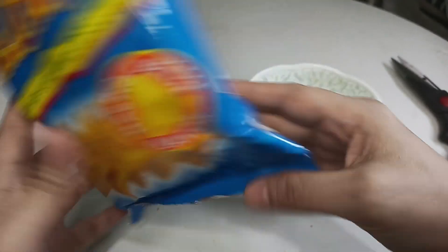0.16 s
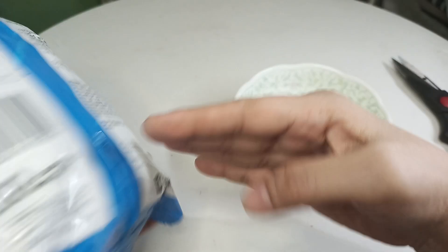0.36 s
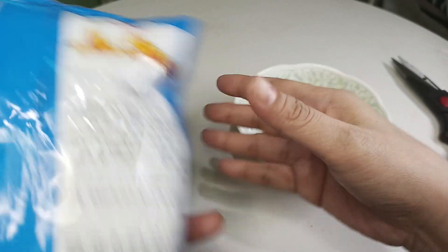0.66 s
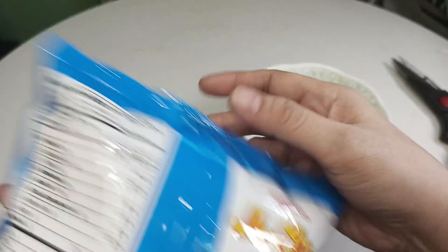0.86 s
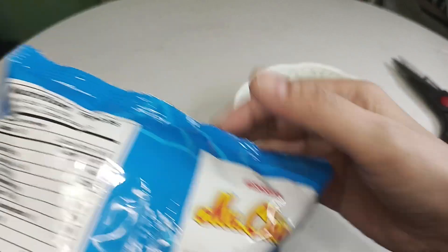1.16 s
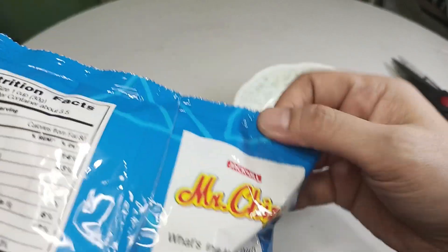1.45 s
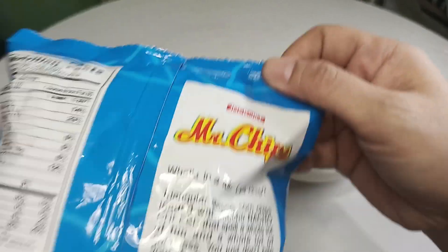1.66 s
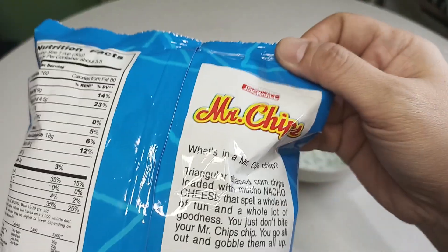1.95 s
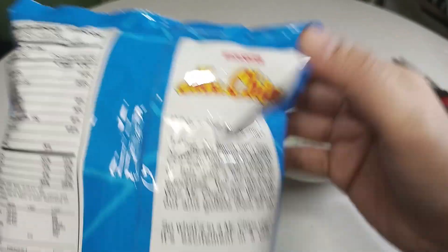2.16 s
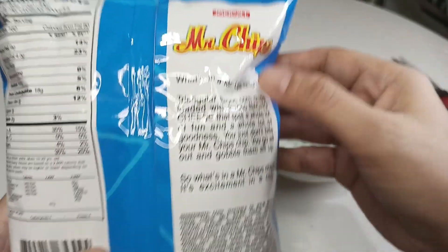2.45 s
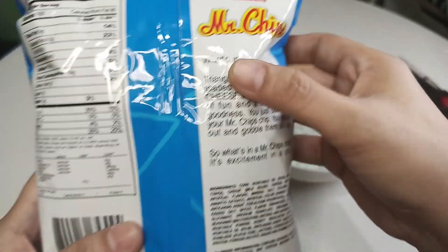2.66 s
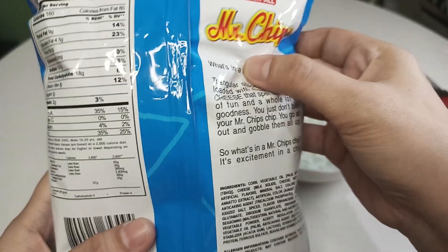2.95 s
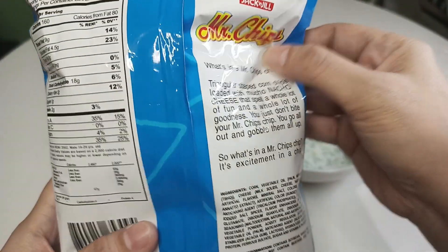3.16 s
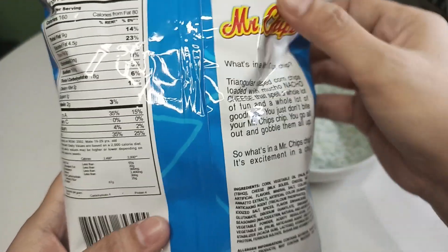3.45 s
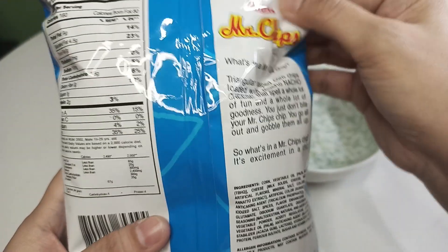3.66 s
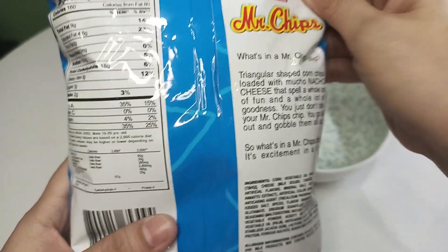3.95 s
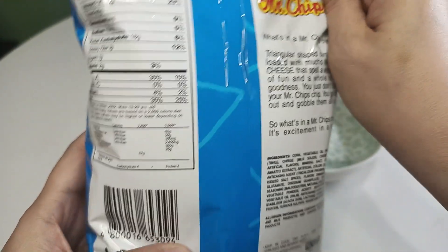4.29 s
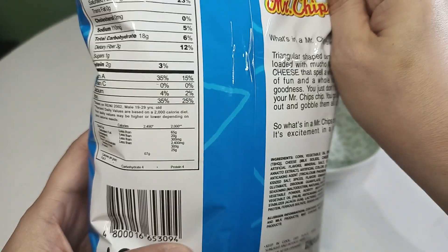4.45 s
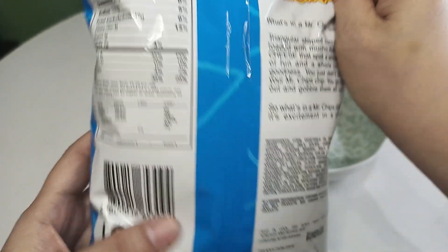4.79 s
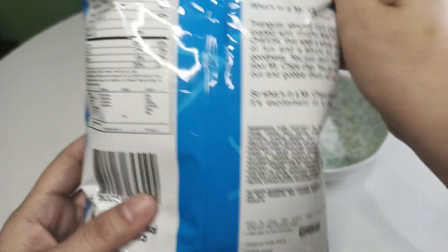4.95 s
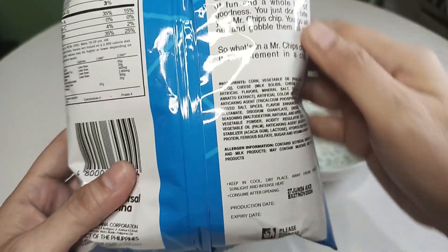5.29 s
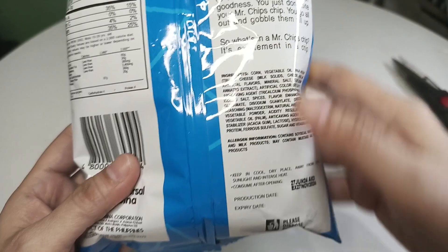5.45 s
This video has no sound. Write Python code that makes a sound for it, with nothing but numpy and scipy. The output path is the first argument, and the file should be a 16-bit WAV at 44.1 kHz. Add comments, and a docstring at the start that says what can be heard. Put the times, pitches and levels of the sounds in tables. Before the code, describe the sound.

Close, crisp bursts of crackling snack-bag film with hollow little pops and sliding chips, over soft room air and a faint hum.

```python
"""Turning a bag of chips

Close to a phone, two hands turn a sealed, air-filled bag of chips over above a table.
Creases in the metallized film snap as noise bursts that ring their facets; taut panels pop as sagging sines.
Showers of tiny ticks make the fine crackle of the film and the chips sliding inside.
Noise echoes give the table top and a small room; filtered noise gives soft air and a low wavering hum."""
import sys
import numpy as np
from scipy import signal
from scipy.fft import rfft, irfft
from scipy.io import wavfile

SR = 44100
rng = np.random.default_rng(int(sys.argv[2]) if len(sys.argv) > 2 else 0)


def store_pcm(level_fs):
    """Save levels as 16-bit WAV."""
    pcm = np.round(np.clip(level_fs, -1, 1) * 32767).astype(np.int16)
    wavfile.write(sys.argv[1], SR, np.atleast_2d(pcm).T)


N = 247842


def undb(db):
    """Decibels to gain."""
    return 10 ** (np.asarray(db) / 20)


def unit(x):
    """Scale to an rms of one."""
    return x / np.sqrt(np.mean(x ** 2) + 1e-20)


def band(x, lo_hz, hi_hz, order=3):
    """Causal band-pass."""
    edges_hz = [lo_hz, min(hi_hz, SR / 2 - 100)]
    return signal.sosfilt(signal.butter(order, edges_hz, "band", fs=SR, output="sos"), x)


def colour(x, points, size=4096):
    """Minimum-phase filter through (Hz, dB) points: it is causal, so attacks stay sharp."""
    hz, db = np.transpose(points)
    grid_hz = np.maximum(np.fft.rfftfreq(size, 1 / SR), 1)
    gain_db = np.interp(np.log(grid_hz), np.log(hz), db)
    # folding the cepstrum forward in time gives the minimum phase
    cepstrum = irfft(np.log(undb(gain_db)))
    cepstrum[1:size // 2] *= 2
    cepstrum[size // 2 + 1:] = 0
    impulse = irfft(np.exp(rfft(cepstrum)))
    return signal.fftconvolve(x, impulse)[:len(x)]


def add(out, at_s, sound):
    """Mix a sound in at a given time."""
    start = int(np.clip(at_s * SR, 0, N - 1))
    out[start:start + len(sound)] += sound[:N - start]


# colour of the quiet room's air: (frequency [Hz], relative density [dB])
ROOM_AIR = [(25, -25), (45, -14), (80, -21.5), (115, 5.5), (160, -3), (240, -4), (310, -18.5), (800, -14),
            (1800, -28), (4000, -29.5), (9500, -35), (13000, -33), (16000, -43)]
# bands of the hum at the listening spot: (centre [Hz], width [Hz], rms level [dB])
HUM_BANDS = [(58.3, 1.3, -67.5), (127.2, 33, -79.5), (237, 5.3, -57.5)]


def background(air_db=-55):
    """Soft room noise and a hum, as of a fan; each hum band is narrow noise, so it wavers."""
    out = undb(air_db) * unit(colour(rng.standard_normal(N), ROOM_AIR))
    for hz, width_hz, db in HUM_BANDS:
        hum = band(rng.standard_normal(N), hz - width_hz / 2, hz + width_hz / 2, order=2)
        out = out + undb(db) * unit(hum)
    return out


# the hands squeeze or turn the bag; levels are before the trims in rustle():
# (start [s], length [s], fine crackle [dB], sliding chips [dB])
HAND_SQUEEZES = [(0.0, 0.15, -49.5, -45), (0.139, 0.34, -50, -40), (0.462, 0.21, -55, -55.5),
                 (0.67, 0.23, -51, -45), (0.909, 0.12, -51, -36.5), (1.307, 0.17, -48.5, -46),
                 (1.515, 0.28, -52, -35), (1.802, 0.16, -65.5, -59), (1.925, 0.091, -73, -44.5),
                 (2.046, 0.12, -49, -38), (2.237, 0.028, -58, -56.5), (2.379, 0.05, -45, -48),
                 (2.653, 0.31, -56, -49), (3.007, 0.17, -49.5, -48), (3.264, 0.042, -40, -36),
                 (3.551, 0.23, -44, -48.5), (3.902, 0.19, -42.5, -40), (4.128, 0.2, -60.5, -59.5),
                 (4.416, 0.038, -60, -48), (4.772, 0.12, -60, -54.5), (4.865, 0.16, -62, -47.5),
                 (5.023, 0.091, -41.5, -39), (5.153, 0.83, -68.5, -61)]
SQUEEZE_ATTACK_S, SQUEEZE_RELEASE_S = 0.0076, 0.0084
HELD_CRACKLE_DB, HELD_CHIPS_DB = -78, -68.5  # the bag merely resting in the hands, before the same trims


def squeezing():
    """Strength of crackle and of sliding chips: each squeeze builds, holds and dies away."""
    t = np.arange(N) / SR
    flex, slide = undb(HELD_CRACKLE_DB), undb(HELD_CHIPS_DB)
    for start_s, length_s, crackle_db, chips_db in HAND_SQUEEZES:
        age = t - start_s
        build = np.clip(age / SQUEEZE_ATTACK_S, 0, 1)
        release = np.exp(-np.maximum(age - length_s, 0) / SQUEEZE_RELEASE_S)
        effort = build * release
        flex = np.maximum(flex, undb(crackle_db) * effort)
        slide = np.maximum(slide, undb(chips_db) * effort)
    return flex, slide


def grains(per_s, spread_db, decay_s, lo_hz, hi_hz, ring_gain, size=400):
    """A shower of tiny ticks, many weak and few strong, each with a short ring of its own."""
    out, t = np.zeros(N), np.arange(size) / SR
    count = int(per_s * N / SR)
    when, strength, pitch = rng.random((count, 3)).T
    scrape = rng.standard_normal((count, size))
    hz = lo_hz * (hi_hz / lo_hz) ** pitch
    ring = ring_gain * np.sin(2 * np.pi * hz[:, None] * t)
    ticks = (scrape + ring) * np.exp(-t / decay_s)
    gains = undb(-spread_db * np.log(0.03 + strength))
    for place, gain, tick in zip(when, gains, ticks):
        add(out, place * N / SR, gain * tick)
    return out


# colour of the film's crackle heard close up: (frequency [Hz], level [dB])
CRACKLE_COLOUR = [(300, -33), (1200, 2), (2600, -2), (4500, -2), (6500, -2), (9000, -4.5), (12000, -6),
                  (16000, -7)]
# colour of the chips sliding inside the bag: (frequency [Hz], level [dB])
CHIPS_COLOUR = [(80, -31), (200, 3.5), (330, 0.5), (550, -3), (900, -5), (1500, 0), (2300, -6),
                (3500, -4.5), (8000, -11.5)]
CRACKLE_TRIM_DB, CHIPS_TRIM_DB = 4, 1


def rustle():
    """While the bag flexes, small wrinkles crackle and the chips tumble against the film."""
    flex, slide = squeezing()
    wrinkles = grains(per_s=300, spread_db=5.5, decay_s=0.0006, lo_hz=2300, hi_hz=9900, ring_gain=1.0)
    chips = grains(per_s=330, spread_db=2.5, decay_s=0.0032, lo_hz=578, hi_hz=2490, ring_gain=0.66)
    crackle = undb(CRACKLE_TRIM_DB) * flex * unit(colour(wrinkles, CRACKLE_COLOUR))
    sliding = undb(CHIPS_TRIM_DB) * slide * unit(colour(chips, CHIPS_COLOUR))
    return crackle + sliding


# the clearest creases buckling, crack taken in the 2.6-6.9 kHz part before room and microphone:
# (time [s], crack level [dB], ring of the facet [Hz], body of the bag relative to the crack [dB])
CLEAR_SNAPS = [(0.0334, -27, 6640, -15), (0.1195, -24, 3700, -6), (0.154, -27, 2900, -12),
               (0.1668, -25, 5800, -7.5), (0.1856, -22.5, 1580, -1.5), (0.2432, -31, 834, 2),
               (0.2509, -19.5, 4530, -8), (0.2838, -16.5, 4460, -9), (0.287, -17, 6900, -4.5),
               (0.3293, -21, 1920, -4.5), (0.3565, -20, 8300, -5), (0.4129, -22.5, 2150, -3),
               (0.5811, -29, 6600, 1.5), (0.7148, -32.5, 5800, -1.5), (0.7377, -19.5, 4520, -9),
               (0.762, -32.5, 2120, 3.5), (0.8613, -37.5, 1210, 6.5), (0.9385, -25.5, 1350, -1),
               (0.9553, -24, 1300, 0.5), (0.9964, -15, 2600, -7), (1.1076, -50, 2650, 9.5),
               (1.2528, -47.5, 5070, -0.5), (1.3513, -21.5, 6200, -7), (1.3583, -21, 2300, -3),
               (1.402, -17, 3000, -9), (1.4098, -15.5, 4380, -10), (1.4534, -19.5, 6400, -23),
               (1.4763, -30.5, 4590, -5), (1.5063, -18, 1110, 1), (1.5345, -22, 4400, -6),
               (1.5789, -22.5, 1150, -4), (1.606, -24, 3900, -9), (1.7044, -26, 1990, 0.5),
               (1.7171, -18.5, 9720, -8.5), (1.7534, -19, 1245, -5), (1.7801, -26, 404, 3),
               (1.918, -45.5, 1360, 10), (1.9346, -23, 6100, -21), (2.0236, -21.5, 2950, -1.5),
               (2.0986, -25, 1756, -3), (2.1105, -27, 3340, -7), (2.1283, -22.5, 9240, -4),
               (2.1496, -27, 2990, -6), (2.1608, -17, 4260, -11), (2.3513, -42.5, 4200, -1),
               (2.386, -35, 3480, -7), (2.4255, -26.5, 1508, -1), (2.4308, -31.5, 3930, -5),
               (2.4601, -31.5, 2810, -6), (2.497, -45, 890, 11.5), (2.5816, -29.5, 3370, -10.5),
               (2.6776, -32, 4700, -13), (2.6913, -35.5, 950, 5), (2.746, -36, 3020, -25),
               (2.7647, -34, 2010, 0), (2.7992, -24, 4540, -2.5), (2.8186, -30.5, 3280, 1),
               (2.8581, -22, 4440, -12), (2.8711, -15, 4760, -5.5), (2.9032, -21.5, 9300, -2.5),
               (2.9844, -31, 6440, -1), (3.0163, -31.5, 2020, 4.5), (3.0344, -25.5, 7640, -8),
               (3.048, -16.5, 4730, -10), (3.1296, -17.5, 6100, -4), (3.1977, -21.5, 8030, -4),
               (3.2204, -29, 2010, 0), (3.2578, -18.5, 5610, -6), (3.2796, -21, 6100, -14),
               (3.3286, -25.5, 3000, -5.5), (3.4406, -30.5, 6250, -6.5), (3.5225, -29.5, 1586, 0),
               (3.566, -15, 5820, -9.5), (3.5981, -25.5, 980, -1), (3.6449, -18.5, 5800, -2.5),
               (3.6761, -26.5, 980, 3.5), (3.6874, -41, 1140, -12), (3.722, -26.5, 5280, -4),
               (3.7427, -20, 6670, -5), (3.8016, -26.5, 4360, -1), (3.8315, -43, 778, 16),
               (3.8466, -12.5, 4840, -15.5), (3.8634, -21, 2150, -1.5), (3.9224, -15.5, 2104, -1),
               (3.9656, -23, 3630, -1.5), (4.0005, -31, 684, 2), (4.008, -24, 789, -1),
               (4.0418, -38.5, 910, 14.5), (4.0692, -24, 8700, -2), (4.2026, -29, 8900, -1),
               (4.2063, -24.5, 9980, -9), (4.213, -22.5, 790, 5), (4.2352, -20, 4230, -6),
               (4.3891, -38.5, 3350, 5.5), (4.4044, -20, 3900, -5.5), (4.5102, -48.5, 970, 10),
               (4.5366, -34.5, 1610, -1), (4.591, -42.5, 2900, -8), (4.6795, -42.5, 604, 13),
               (4.6984, -52, 11400, -12), (4.785, -57, 10800, -4), (4.8491, -19.5, 3820, -7.5),
               (4.8801, -23, 4100, -9), (4.9742, -41.5, 1185, 10), (5.0349, -28, 5350, 0.5),
               (5.072, -31, 1980, 3.5), (5.0885, -16, 9000, -3), (5.1263, -22, 7200, -7.5),
               (5.139, -26, 2330, -1), (5.224, -37.5, 2130, 0.5), (5.355, -37, 2480, 3),
               (5.3965, -26.5, 6820, -4), (5.5994, -23.5, 813, -1.5)]
# lesser creases that give way during a squeeze; level is relative to its untrimmed crackle
CREASES_PER_S, CREASE_DB, CREASE_SPREAD_DB = 14, 0.5, 7
CREASE_RING_HZ, CREASE_BODY_DB = 3400, -0.5  # the ring strays up to an octave either way


def creases():
    """The clear snaps, joined by lesser ones at random moments of each squeeze."""
    rows = list(CLEAR_SNAPS)
    for start_s, length_s, crackle_db, _ in HAND_SQUEEZES:
        for _ in range(round(CREASES_PER_S * length_s)):
            loud, high = rng.standard_normal(2)
            at_s = start_s + rng.random() * length_s
            crack_db = crackle_db + CREASE_DB + CREASE_SPREAD_DB * loud
            ring_hz = CREASE_RING_HZ * 2 ** np.tanh(high)
            rows.append((at_s, crack_db, ring_hz, CREASE_BODY_DB))
    return np.array(rows)


# what a snap sets moving, in order air cushion, panel, crack and fizz:
# (low edge [Hz], high edge [Hz], decay before stretching [s], stretch by the facet's size [0-1])
SNAP_PARTS = [(219, 804, 0.0046, 0.64), (855, 2165, 0.0028, 0.66), (2640, 6880, 0.0023, 0.4),
              (8300, 15000, 0.0017, 0.7)]
# how hard the air cushion thumps as the bag is held more or less firmly:
# (time [s], thump relative to the body [dB])
HOLD_FIRMNESS = [(0, -8.5), (1.35, -15.5), (1.75, -2), (2.15, -2), (2.5, -9), (4.1, -1.5), (5.6, -5.5)]
# fizz that goes with each facet ring, before thin snaps gain more:
# (ring of the facet [Hz], fizz relative to the crack [dB])
FACET_FIZZ = [(900, -2.5), (2400, -12), (4400, -1.5), (6500, -1.5), (9300, 0), (10700, 20)]
THIN_BODY_DB, THIN_FIZZ_SLOPE = -5, 0.18  # snaps with less body than this gain fizz (dB per dB)


def snaps(rows, ring_gain, rise_s=0.00041, ring_q=6.9, unevenness=0.56, span_s=0.0018, size=1400, hold=5):
    """Each crease flips in a burst of uneven slips that rings its facet and shakes film and trapped air."""
    out, t = np.zeros(N), np.arange(size) / SR
    # the crease gives way in jerks of `hold` samples, a few of them much stronger than the rest
    jerks = np.exp(unevenness * rng.standard_normal((len(rows), size // hold)))
    slips = rng.standard_normal((len(rows), size)) * np.repeat(jerks, hold, axis=1)
    at_s, crack_db, ring_hz, body_db = rows.T
    thump_db = body_db + np.interp(at_s, *np.transpose(HOLD_FIRMNESS))
    thin_db = np.maximum(THIN_BODY_DB - body_db, 0)
    fizz_db = np.interp(ring_hz, *np.transpose(FACET_FIZZ)) + THIN_FIZZ_SLOPE * thin_db
    rung = []
    for slip, hz in zip(slips, ring_hz):
        ring = signal.lfilter(*signal.iirpeak(hz, ring_q, SR), slip)
        rung.append(slip + ring_gain * ring)
    rung = np.array(rung)
    # a small facet moves little air and flips fast; a large one is slower
    slowness = np.clip(undb(0.29 * (thump_db + 21.5)), 0.35, 1.5)
    bursts = 0
    for (lo, hi, decay_s, stretch), part_db in zip(SNAP_PARTS, (thump_db, body_db, 0, fizz_db)):
        age = t / slowness[:, None] ** stretch
        envelope = (1 - np.exp(-(age / rise_s) ** 2)) * np.exp(-age / decay_s)
        part = band(rung * envelope, lo, hi)
        # the burst's whole energy, as an rms over span_s
        strength = np.sqrt(np.sum(part ** 2, axis=1) / (span_s * SR))
        gain = undb(crack_db + part_db) / strength
        bursts = bursts + part * gain[:, None]
    for s, burst in zip(at_s, bursts):
        add(out, s, burst)
    return out


def room(x, near_db=-7, near_t60_s=0.1, far_db=-26, far_t60_s=0.28, build_s=0.0052, size=12000, count=70):
    """Dense echoes from the table and near things, then a faint dull tail from the walls."""
    out, t = np.zeros(N), np.arange(size) / SR
    onset = 1 - np.exp(-(t / build_s) ** 4)
    # the bag keeps moving, so the echo paths differ from one moment to the next
    for moment in np.array_split(np.arange(N), count):
        near, far = rng.standard_normal((2, size)) * onset
        near = near * np.exp(-np.log(1000) * t / near_t60_s)
        far = far * np.exp(-np.log(1000) * t / far_t60_s)
        table = undb(near_db) * near / np.linalg.norm(near)
        walls = undb(far_db) * band(far / np.linalg.norm(far), 150, 6000, order=1)
        add(out, moment[0] / SR, signal.fftconvolve(x[moment], table + walls))
    return out


# taut panels popping through with a hollow note; level is before pop_db and the rise and fade:
# (time [s], level [dB], starting note [Hz], decay [s])
PANEL_POPS = [(0.185, -8.5, 1646, 0.0043), (0.242, -14.5, 786, 0.0037), (0.345, -13.5, 564, 0.0054),
              (0.922, -15, 1294, 0.0063), (0.932, -31, 1210, 0.006), (1.507, -16, 1110, 0.0044),
              (1.718, -21.5, 322, 0.014), (1.779, -26, 700, 0.011), (2.645, -16.5, 1270, 0.0017),
              (2.875, -14.5, 808, 0.0046), (3.49, -35.5, 1600, 0.0095), (3.631, -13, 685, 0.005),
              (4.178, -27.5, 520, 0.006), (4.213, -37, 766, 0.0054), (4.68, -14.5, 463, 0.0027),
              (5.09, -14, 827, 0.008)]


def pops(pop_db=-7, rise_s=0.0007, sag=0.016, size=2400):
    """A panel stretched over the air cushion rings for a few cycles, its note sagging as it relaxes."""
    out, t = np.zeros(N), np.arange(size) / SR
    for s, db, hz, decay_s in PANEL_POPS:
        fade = np.exp(-t / decay_s)
        note_hz = hz * (1 - sag * (1 - fade))
        phase = 2 * np.pi * np.cumsum(note_hz) / SR
        rise = 1 - np.exp(-t / rise_s)
        add(out, s, undb(db + pop_db) * rise * fade * np.sin(phase))
    return out


# broad resonances of the filled bag above the table: (frequency [Hz], level [dB])
BAG_RESONANCES = [(250, 1), (380, -1), (560, 2), (650, -4), (790, 4), (950, 1.5), (1150, 2), (1380, -1),
                  (1600, .5), (2200, 1), (2550, -1), (2900, 0.5)]


def scene():
    """A facet beams its ring at the phone; the room gets the broader sound of the whole bag."""
    flexing = rustle() + pops()
    buckling = creases()
    direct = snaps(buckling, ring_gain=2.2) + flexing
    echoes = room(snaps(buckling, ring_gain=0.41) + flexing)
    bag = colour(direct + echoes, BAG_RESONANCES)
    return (bag + background())[None]


# response of the phone's microphone, close to the bag: (frequency [Hz], level [dB])
PHONE_MICROPHONE = [(100, 2.5), (6800, -0.5), (8000, -3.5), (9500, -1), (11000, -8.5), (13300, -13.5),
                    (14200, -13.5), (15200, 0.5), (16200, -16)]
TOP_HZ = 16300


def record(dry):
    """The phone's microphone colours the treble and a steep low-pass cuts the top."""
    cut = signal.ellip(10, 0.2, 70, TOP_HZ, fs=SR, output="sos")
    return signal.sosfilt(cut, colour(dry[0], PHONE_MICROPHONE))[None]


dry = scene()
out = record(dry)
store_pcm(out)
```